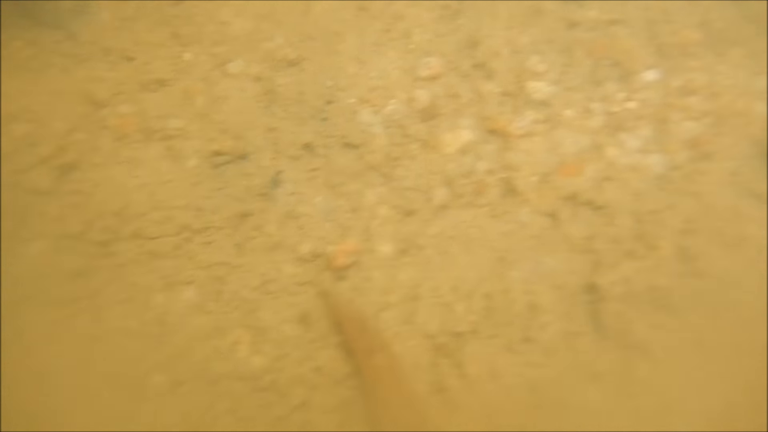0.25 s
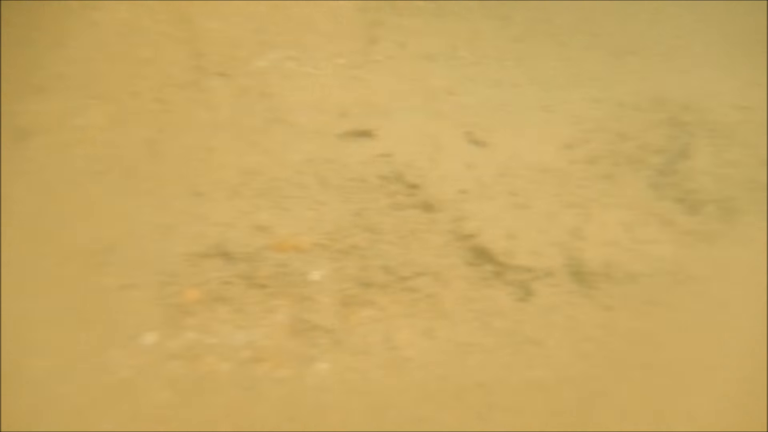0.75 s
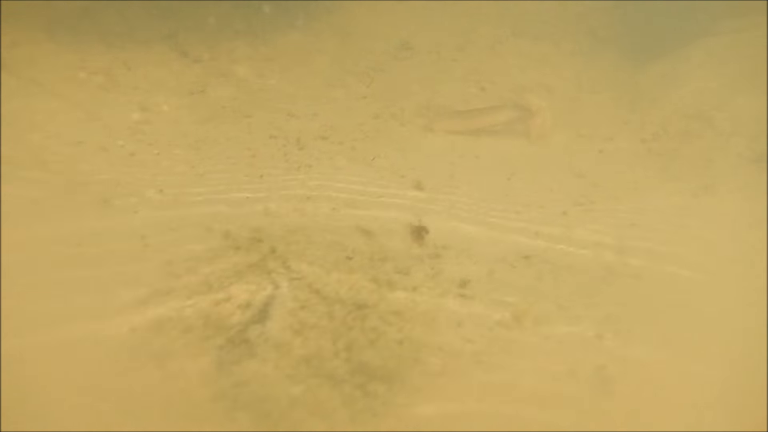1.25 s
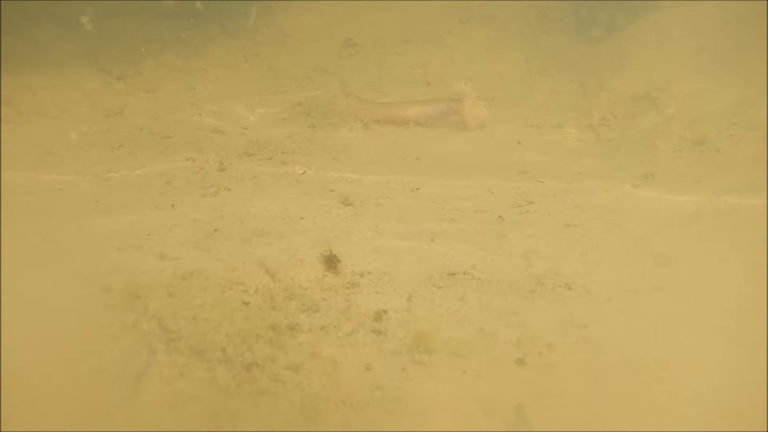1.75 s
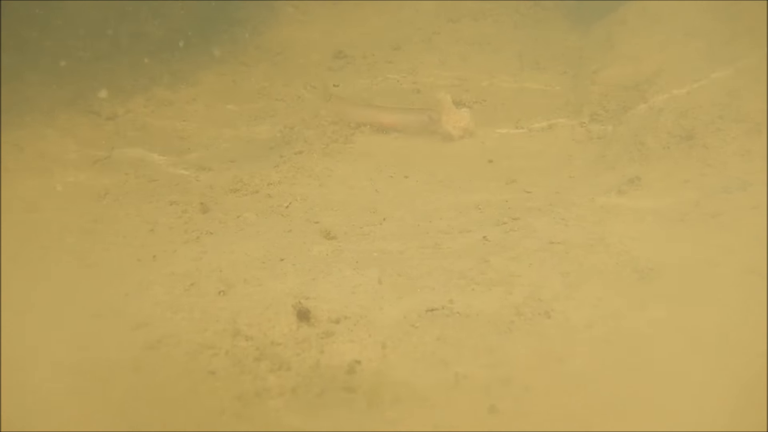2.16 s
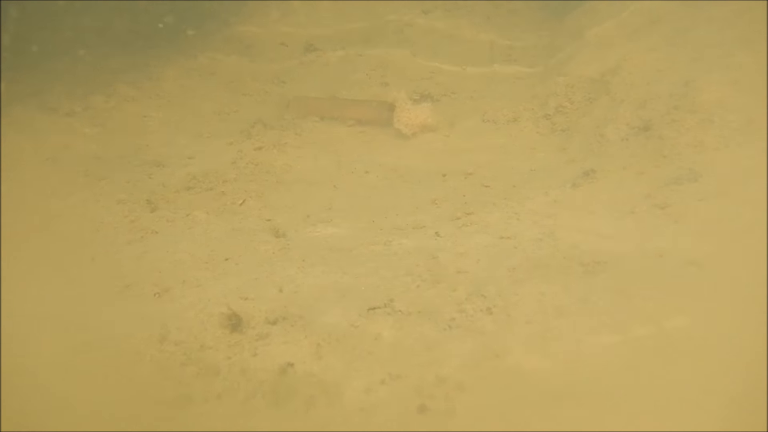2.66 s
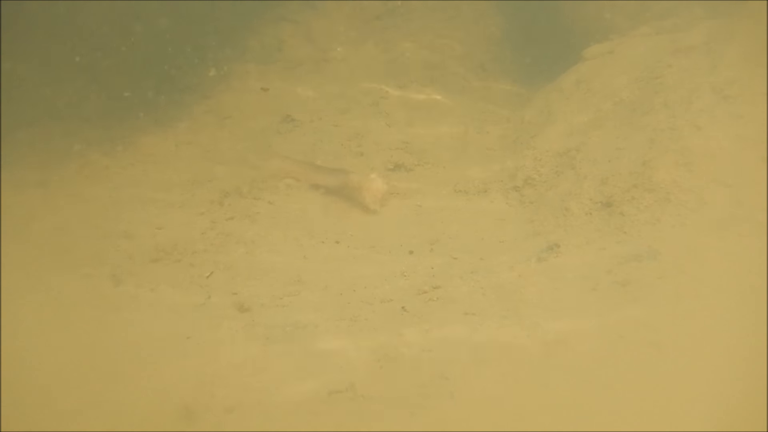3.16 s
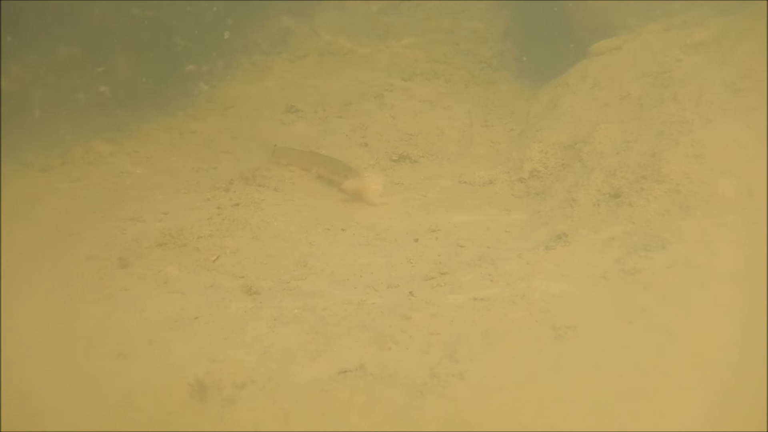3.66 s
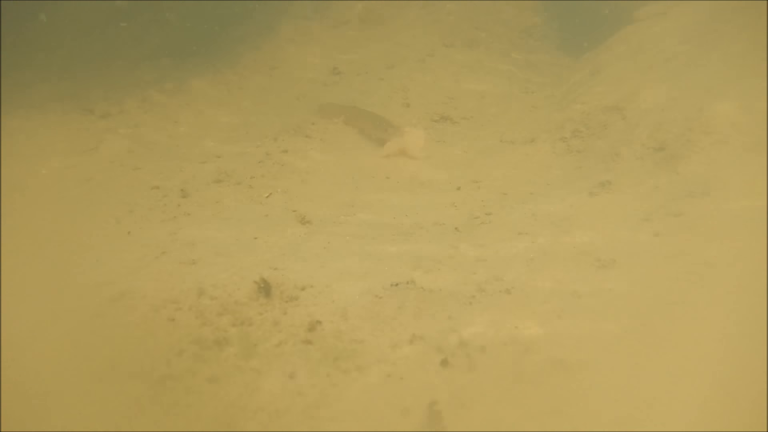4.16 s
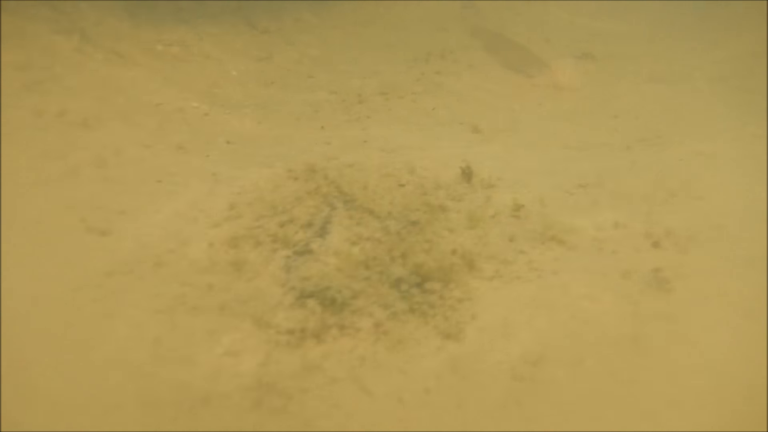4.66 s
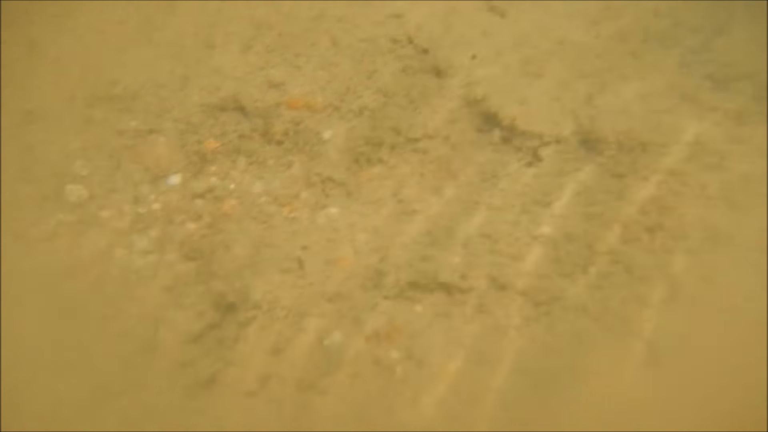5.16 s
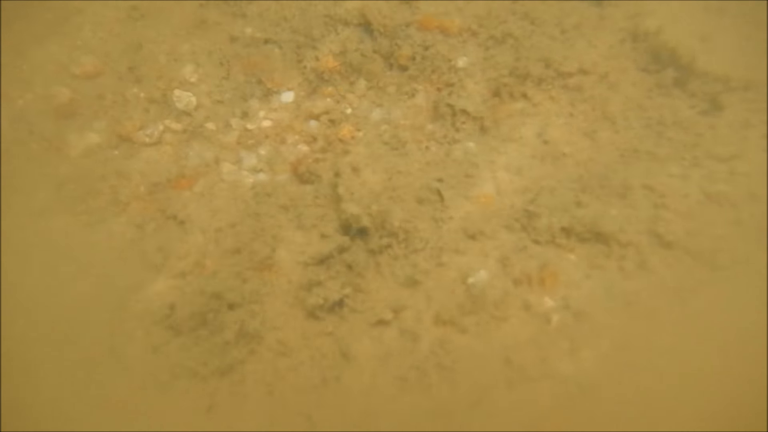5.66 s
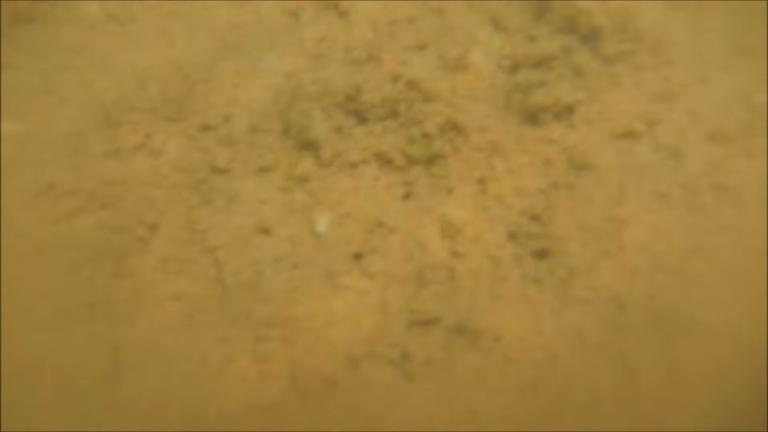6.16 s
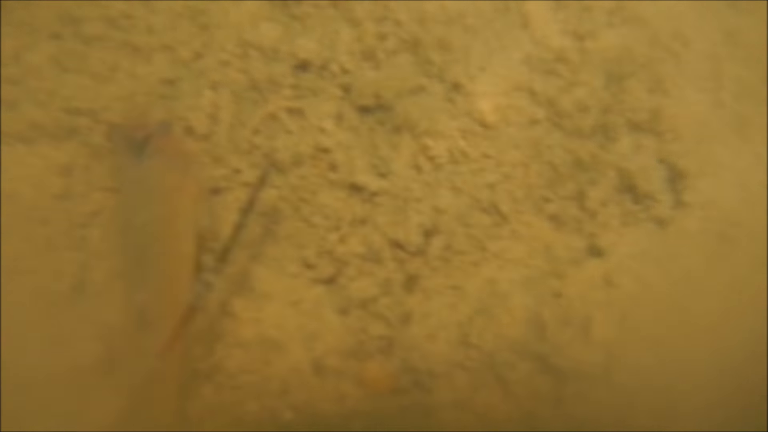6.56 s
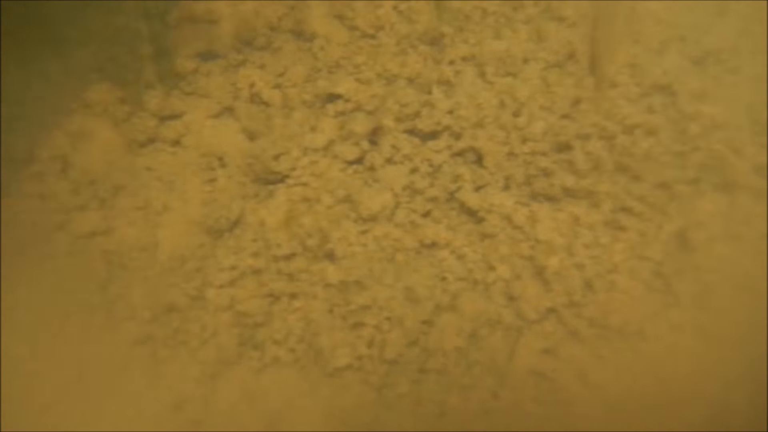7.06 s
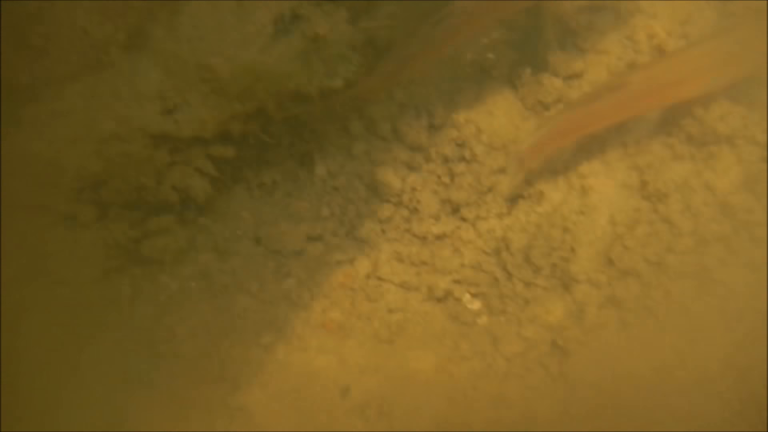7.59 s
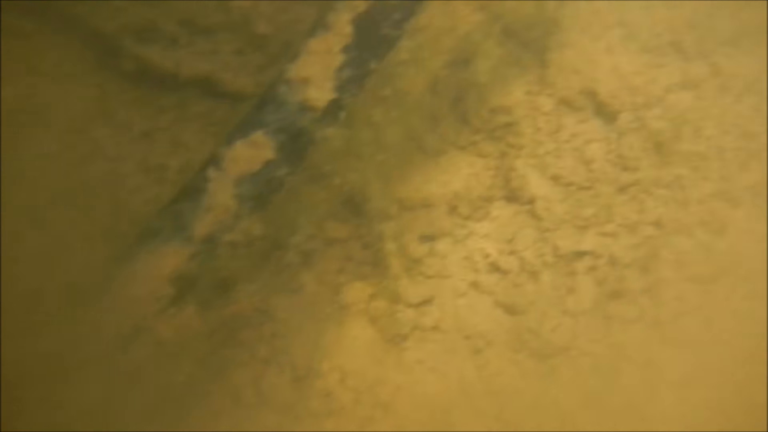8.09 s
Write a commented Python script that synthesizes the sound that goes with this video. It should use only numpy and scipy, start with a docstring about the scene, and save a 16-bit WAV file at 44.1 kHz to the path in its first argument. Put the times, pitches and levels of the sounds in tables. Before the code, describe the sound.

A microphone sealed in a camera housing hears a muffled, midrange-heavy underwater rush, a wavering hollow low hum and a deep, uneven wobble. The motion is fairly brisk at first. Around 0.4-0.55 s a cluster of hard, short, hollow knocks with clicks strikes; the background drops sharply, then climbs back over nearly two seconds. Faint scrapes and weak knocks follow, with a stronger knock at 1.5 s and others near 2.4 s. From 2.6 to 3.3 s the hum swells, and soft grip thumps and knocks gather. It calms around 3.7 s, then knocks at 4.4 s and grows busier from 5 s. A bright click and knocks at 6.4 s duck the rush again, with tiny gurgles. From 7.1 s gurgles, scrapes and dense knocks continue to about 8.3 s, ducking deeply near 8.2 s. Faint hiss, thin piping and a very high whine stay underneath.

```python
"""Moving a camera under water

A camera in a sealed housing is moved about above sand. Water and sand stir the housing's modes, which ring
over a broad wash, and its air pocket hums. The grip creaks and thumps; knocks and scrapes ring the shell,
short clicks fall mostly on knocks, and forced water gurgles. A thin piping, a whine and hiss lie on top.
At listed moments the rush, hum, small thumps, wobble, piping, whine and hiss drop in level, then climb
back; other events do not."""
import sys
import numpy as np
from scipy import signal
from scipy.fft import rfft, irfft
from scipy.io import wavfile
from scipy.ndimage import uniform_filter1d

SR = 44100
rng = np.random.default_rng(int(sys.argv[2]) if len(sys.argv) > 2 else 0)


def store_pcm(level_fs):
    """Save levels as 16-bit WAV."""
    pcm = np.round(np.clip(level_fs, -1, 1) * 32767).astype(np.int16)
    wavfile.write(sys.argv[1], SR, np.atleast_2d(pcm).T)


N = 367353  # length in samples


def undb(db):
    """Turn dB into gain."""
    return 10 ** (np.asarray(db) / 20)


def unit(x):
    """Scale to an rms of 1."""
    return x / np.sqrt(np.mean(x ** 2))


def pan(db, rad=0.):
    """Complex gains of the left and right port: the left is louder by db and leads by rad."""
    side = np.array([[.5], [-.5]])
    return undb(db * side) * np.exp(1j * rad * side)


def ring(x, hz, t60):
    """One decaying mode as a complex oscillation; it falls 60 dB in t60 seconds."""
    pole = np.exp(2j * np.pi * hz / SR - np.log(1000) / (t60 * SR))
    return signal.lfilter([1], [1, -pole], x)


def soften(x, hz):
    """Water takes the edge off a pulse: a low-pass at hz, at most 9 kHz."""
    return signal.sosfilt(signal.butter(2, min(hz, 9000), fs=SR, output="sos"), x)


def high_pass(x, order, hz):
    """Take away the part below hz."""
    return signal.sosfilt(signal.butter(order, hz, "high", fs=SR, output="sos"), x)


def spectrum_gain(points, size):
    """Gain of each frequency bin, drawn through (Hz, dB) points on a log scale."""
    hz, db = np.transpose(points)
    bins_hz = np.fft.rfftfreq(size, 1 / SR)
    return undb(np.interp(np.log(bins_hz + 1), np.log(hz), db))


def coloured(points, alike):
    """Two noises with a given spectrum; alike (-1 to 1) is how much the ports agree."""
    mid, side = irfft(rfft(rng.standard_normal((2, N))) * spectrum_gain(points, N), N)
    a, b = np.sqrt(1 + np.clip(alike, -1, 1)), np.sqrt(1 - np.clip(alike, -1, 1))
    return unit(np.array([a * mid + b * side, a * mid - b * side]))


def walk(rate):
    """Random levels held for 1 / rate seconds, then smoothed twice; spread near 1."""
    hold = int(SR / rate)
    steps = np.repeat(rng.standard_normal(N // hold + 1), hold)
    return 1.19 * uniform_filter1d(uniform_filter1d(steps, hold), hold)[:N]


def grains(rate, spread_db):
    """Lone pulses at random moments (rate per second), a few bigger than the rest."""
    hits = rng.random(N) < rate / SR
    return hits * undb(spread_db * np.minimum(rng.exponential(size=N), 3))


def swells(table):
    """Short rises in dB: a straight climb to each peak and a straight fall."""
    t = np.arange(N) / SR
    rises = [db * np.clip(1 - 2 * np.abs(t - s) / length, 0, 1) for s, length, db in table]
    return np.max(rises, axis=0)


# The modes of the housing, also used for the knocks and scrapes. ring_s is the free ring to -60 dB.
# Columns: pitch_hz, ring_s, struck_db, tilt_share, flow_db, left_over_right_db, left_lead_rad
SHELL_MODES = [(426.5, 0.032, -8.5, 0.2, 2, -5.5, 0.2), (539.7, 0.038, 1, 0.051, 3, -4.5, 1.19),
               (675, 0.022, 9.5, 0.81, -13, 1, 1.43), (845.5, 0.022, -2, 0.54, -3, 1.5, 1),
               (1321, 0.021, -7.5, 1.26, -10, -0.5, 1), (1770, 0.012, -11, 1.2, -13, 5, 1.85),
               (2140, 0.011, -16.5, 1.3, -30.5, 6, 2.4)]
SHELL_LOW_CUT_HZ = 210
# The colour of the wash. Columns: pitch_hz, level_db (per Hz, relative)
WASH_COLOUR = [(88, -50), (150, -34), (220, -18), (300, -6.5), (529, -4.5), (854, -6.5), (1100, -22.5),
               (1340, -22), (3050, -57.5), (3960, -83.5)]
RUSH_DB, RUSH_MOTION_DB = -27, 1
FIZZ_DB, FIZZ_MOTION_DB, FIZZ_DIP_SHARE = -42.5, 1, 0.93
LUMP_DB = 1.5  # spread of the lumps in the low part


def rush(motion, sunk_db):
    """Eddies and sand grains stir each shell mode on its own, over a broad wash; the low part is lumpy."""
    low, fizz, lumps = 0, 0, undb(LUMP_DB * walk(18))
    for hz, t60, _, _, flow_db, pan_db, rad in SHELL_MODES:
        eddies = rng.standard_normal(N) * undb(3.2 * walk(14))
        sand = unit(grains(60, 3.2)) * 0.49
        mode = ring(soften(eddies + sand, 1.37 * hz), hz, t60)
        voice = undb(flow_db) * unit((pan(pan_db, rad) * mode).imag)
        if hz < 1000:
            low = low + voice
        else:
            fizz = fizz + voice
    low = unit(high_pass(low, 3, SHELL_LOW_CUT_HZ))
    wash = coloured(WASH_COLOUR, 0.15) * undb(0.68 * walk(11)) * pan(-4.0).real
    low_db = RUSH_DB + RUSH_MOTION_DB * motion + sunk_db
    fizz_db = FIZZ_DB + FIZZ_MOTION_DB * motion + FIZZ_DIP_SHARE * sunk_db
    return undb(low_db) * lumps * (low + wash * undb(-3.0)) + undb(fizz_db) * unit(fizz)


# Moments when the hum swells up. Columns: peak_s, length_s, rise_db
HUM_SWELLS = [(.3, 0.14, 9.5), (.46, 0.06, 26), (2.05, 0.13, 8), (2.37, 0.13, 13), (2.54, 0.21, 16.5),
              (2.62, 0.2, 9), (2.8, 0.087, 7), (3.16, 0.043, 15.5), (5.1, 0.076, 12.5), (5.26, 0.06, 5),
              (7.63, 0.039, 20)]
HOLLOW_HZ, HOLLOW_WIDTH_HZ, HOLLOW_WANDER_HZ, HOLLOW_PAN_DB = 279.9, 35, 7, -4  # nominal width
HUM_DB, HUM_MOTION_DB, HUM_DIP_SHARE, HUM_WAVER_DB = -33, 4, 0.98, 3.5


def hollow(motion, sunk_db):
    """The air pocket in the housing hums: noise in a narrow resonance, its swings partly evened out."""
    z = ring(rng.standard_normal(N), HOLLOW_HZ, 2.2 / HOLLOW_WIDTH_HZ)
    z = ring(z, HOLLOW_HZ, 0.96 / HOLLOW_WIDTH_HZ)
    evened = z / (np.abs(z) + 1e-9) ** 0.16
    z = ring(evened, HOLLOW_HZ, 0.89 / HOLLOW_WIDTH_HZ)
    # the pocket changes shape, so its pitch wanders
    z = z * np.exp(2j * np.pi * np.cumsum(HOLLOW_WANDER_HZ * walk(9)) / SR)
    hum_db = HUM_DB + HUM_MOTION_DB * motion + HUM_DIP_SHARE * sunk_db
    hum_db = hum_db + swells(HUM_SWELLS) + HUM_WAVER_DB * walk(15)
    return undb(hum_db) * unit((pan(HOLLOW_PAN_DB, 0.15) * z).imag)


# Rubbing along the shell. tilt_db lifts (+) or lowers (-) modes by their share.
# Columns: start_s, length_s, level_db (relative), tilt_db
SCRAPES = [(0.413, 0.087, -17, -9), (0.61, 0.071, -24, -12), (0.997, 0.046, -31, -2),
           (1.053, 0.049, -30.5, -7.5), (1.396, 0.027, -30, -12), (1.71, 0.071, -27.5, -13.5),
           (2.053, 0.08, -20.5, -15), (2.306, 0.12, -21, -9), (3.033, 0.056, -15.5, -23),
           (3.134, 0.02, -14.5, -13), (4.435, 0.025, -14, -29), (5.04, 0.07, -22, -2.5),
           (5.09, 0.22, -20, -22), (5.497, 0.1, -20, -11.5), (6.093, 0.035, -24, 4),
           (6.167, 0.041, -15.5, 0.5), (6.292, 0.1, -16, -13.5), (6.404, 0.079, -21.5, -7.5),
           (6.513, 0.083, -23, -11.5), (6.684, 0.021, -31.5, 7), (7.239, 0.029, -26.5, 7.5),
           (7.469, 0.027, -18, 0.5), (7.783, 0.057, -18, -26), (7.913, 0.13, -16, -13),
           (8.038, 0.06, -21, -19), (8.186, 0.085, -21.5, -13.5)]


def scrape_force(grit, tilt_share):
    """Each scrape is a shower of grit that swells and fades."""
    t = np.arange(N) / SR
    force = np.zeros(N)
    for start, length, rub_db, tilt_db in SCRAPES:
        span = slice(int(start * SR), int((start + length) * SR))
        progress = np.abs((t[span] - start) / length)
        envelope = np.abs(np.sin(np.pi * progress ** 0.85))
        force[span] += undb(rub_db + tilt_share * tilt_db - 18.5) * envelope * grit[span]
    return force


# Single knocks. tilt_db works as above; main_hz is the bent pitch of the second mode.
# Columns: start_s, level_db (relative), tilt_db, main_hz, ring_length (nominal, free shell = 1)
KNOCKS = [(0.3981, -3.5, -8, 578, 0.73), (0.4263, -14, -16, 540, 0.73), (0.4455, -1.5, -22, 536, 0.51),
          (.457, -1, -12, 580, 0.46), (.4635, -7, -15, 575, 0.61), (0.526, -4.5, -17, 544, 0.68),
          (.611, -22.5, -18.5, 536, 0.89), (.724, -16.5, -21, 487, 0.51), (0.7816, -20, -22, 511, 1.47),
          (1.013, -24, -12, 555, 0.61), (1.0305, -28.5, -7, 687, 0.86), (1.077, -27, -19, 503, 0.88),
          (1.129, -22, -32, 510, 0.56), (1.504, -0.5, -6.5, 523, 0.45), (1.72, -17.5, -25, 500, 0.51),
          (1.767, -20, -20, 550, 0.57), (1.787, -10.5, -32, 514, 0.48), (2.042, -12.5, -33, 536, 1),
          (2.375, -2, -29, 525, 0.63), (2.629, -11, -24, 510, 0.54), (3.032, -6.5, -35, 520, 0.67),
          (3.06, -9.5, -16, 516, 0.53), (3.067, -9.5, -16, 513, 0.35), (3.153, -12, -18, 540, 0.76),
          (3.164, -13, -25, 534, 0.76), (3.29, -5.5, -22, 497, 0.42), (4.443, -0.5, -33, 503, 0.55),
          (4.456, -10.5, -30, 453, 0.58), (4.694, -10.5, -21, 732, 0.62), (4.937, -4.5, -31, 472, 0.66),
          (5.333, -13.5, -13, 540, 0.72), (5.417, -2, -24, 552, 0.64), (5.591, -9.5, -23, 510, 0.88),
          (5.609, -1.5, -12.5, 514, 0.37), (5.756, -2, -26, 520, 0.41), (6.064, -9.5, -17, 514, 0.59),
          (6.092, -20, 7, 535, 0.86), (6.103, -14, 1.5, 524, 0.4), (6.186, -12.5, 2.5, 546, 0.42),
          (6.36, -3, -0.5, 508, 0.44), (6.396, -8, 3.5, 530, 0.44), (6.521, -22, -4, 534, 0.79),
          (6.689, -36, 13, 542, 0.57), (7.087, -2.5, -42, 537, 0.63), (7.176, -29, 11, 552, 0.87),
          (7.245, -28, 8, 530, 0.8), (7.3351, -4.5, -16, 532, 0.64), (7.396, -8, -19, 534, 0.51),
          (7.412, -15, -12, 520, 0.62), (7.48, -17.5, 7, 535, 0.67), (7.489, -18, 4, 540, 0.6),
          (7.537, -2.5, -10, 522, 0.44), (7.629, -3.5, -12, 520, 0.49), (7.874, -4.5, -9.5, 510, 0.8),
          (7.895, -9.5, -10.5, 547, 0.92), (7.931, -9, -18.5, 514, 0.44), (7.952, -10.5, -22.5, 543, 0.63),
          (7.967, -11.5, -22, 540, 0.62), (8.011, -7, -14.5, 535, 0.52), (8.173, -9.5, 1, 557, 0.89),
          (8.22, -6, -7.5, 529, 0.66), (8.225, -4, -5, 527, 0.68)]
SPOT_DB, DETUNE = 1.2, 0.014  # spread from blow to blow: level, share of the pitch
RISE_CYCLES, IN_STEP_S = 0.57, 0.002805  # build-up; time when the modes swing in step
TAIL_DB, TAIL_STRETCH = -15.5, 2.91  # faint tail: its level, how many times longer it rings


def knock_blows(hz, t60, tilt_share):
    """Water loads the shell so a blow builds up; the hand damps it and bends its pitch; a tail rings on."""
    s, db, tilt_db, main_hz, ring_length = np.transpose(KNOCKS)[:, :, None]
    spot, off = rng.standard_normal((2, len(s), 1))  # every blow lands on another spot
    since = np.arange(SR // 10) / SR
    blow_hz = hz * main_hz / SHELL_MODES[1][0] * (1 + DETUNE * off)
    fade = np.exp(-np.log(1000) * since / (0.88 * t60 * np.abs(ring_length)))
    rise = (1 - np.exp(-since * hz / RISE_CYCLES)) ** 4
    shape = rise * (fade + undb(TAIL_DB) * fade ** (1 / TAIL_STRETCH))
    swing = np.exp(2j * np.pi * blow_hz * (since - IN_STEP_S))
    blows = -2.1 * undb(db + tilt_share * tilt_db + SPOT_DB * spot) * shape * swing
    out = np.zeros(N, complex)
    for at, blow in zip((s[:, 0] * SR).astype(int), blows):
        out[at:at + len(blow)] += blow[:N - at]
    return out


SHELL_TOP_HZ = 2290


def contacts():
    """Knocks are single pushes and scrapes are showers of grit; both ring the shell."""
    grit = unit(grains(700, 3.5) * rng.choice([-1, 1], N))
    out = 0
    for hz, t60, struck_db, tilt_share, _, pan_db, rad in SHELL_MODES:
        force = soften(scrape_force(grit, tilt_share), 1.43 * hz)
        swell = ring(force, hz, 0.013) / (0.00092 * SR)
        z = ring(swell, hz, 0.47 * t60) + knock_blows(hz, t60, tilt_share)
        out = out + undb(struck_db) * (pan(pan_db, rad) * z).imag
    return soften(high_pass(out, 2, SHELL_LOW_CUT_HZ), SHELL_TOP_HZ)


# Short clicks, mostly on knocks. Columns: start_s, level_db (relative), length_s
CLICKS = [(0.399, -22.5, 0.0059), (0.458, -22, 0.0008), (.7746, -44, 0.003), (1.504, -22.5, 0.0031),
          (2.375, -30, 0.0012), (4.444, -28, .0018), (5.413, -26, 0.0021), (5.607, -22.5, 0.0013),
          (6.3603, -14.5, 0.0036), (6.3976, -25, 0.0016), (7.479, -31, 0.0048), (7.54, -23, 0.0013),
          (7.629, -24.5, 0.0013), (7.8737, -25.5, 0.0018), (8.176, -22, 0.0021), (8.2274, -25.5, 0.0028)]
# The colour of a click. Columns: pitch_hz, level_db (per Hz, relative)
CLICK_COLOUR = [(700, -22), (1300, 3), (2200, 2), (3500, -19.5), (5000, -23), (9000, -31.5), (14000, -37)]


def clicks():
    """Each click is a few milliseconds or less of click noise, partly different at the two ports."""
    burst, click_noise = np.zeros((2, N)), coloured([(100, 0), (20000, 0)], .5)
    for s, db, length in CLICKS:
        at, size = int(s * SR), int(length * SR) + 2
        burst[:, at:at + size] += undb(db) * signal.windows.hann(size) * click_noise[:, at:at + size]
    taps = np.fft.fftshift(irfft(spectrum_gain(CLICK_COLOUR, 512)))
    return signal.fftconvolve(burst, taps[None] / np.linalg.norm(taps), "same")


# The hand shifts on the grip. Columns: peak_s, length_s, rise_db
GRIP_SHIFTS = [(2.71, 0.2, 12), (2.9, 0.081, 13), (3.04, 0.25, 15), (3.16, 0.11, 22), (3.97, 0.079, 14),
               (5.06, 0.13, 6.5), (7.4, 0.41, 2.5), (5.33, 0.07, 4.5)]
# The biggest jerks of the grip. Columns: start_s, level_db (relative)
JERKS = [(0.006, -20), (0.079, -15), (2.705, -14.5), (2.716, -16), (2.901, -16.5), (3.044, -14.5),
         (3.138, -20), (3.356, -15), (3.951, -15.5), (4.413, -16.5), (4.433, -14.5), (5.036, -12.5),
         (5.065, -18), (5.179, -14), (5.192, -16), (5.334, -16), (6.262, -18), (6.269, -12.5), (6.345, -15),
         (7.336, -15.5), (7.36, -15), (7.451, -15)]
# levels going into the thump shaping and the panning
GRIP_DB, GRIP_MOTION_DB, GRIP_DIP_SHARE, GRIP_WAVER_DB = -59, 19.5, 0.73, 2
WOBBLE_DB, WOBBLE_MOTION_DB, WOBBLE_DIP_SHARE, WOBBLE_SHIFT_SHARE = -39.5, 9.5, 0.74, 0.6


def grip(motion, sunk_db):
    """The hand slips in uneven jerks: soft thumps over a deep wobble, different at each port."""
    shift_db = swells(GRIP_SHIFTS)
    grip_db = GRIP_DB + GRIP_MOTION_DB * motion + GRIP_DIP_SHARE * sunk_db
    grip_db = grip_db + shift_db + GRIP_WAVER_DB * walk(12)
    wobble_db = WOBBLE_DB + WOBBLE_MOTION_DB * motion + WOBBLE_DIP_SHARE * sunk_db
    wobble_db = wobble_db + WOBBLE_SHIFT_SHARE * shift_db
    slips = np.array([grains(110, 1.0) for _ in range(2)])
    slips = unit(slips + 0.076 * slips[::-1]) * undb(grip_db)  # a little reaches the other port
    s, jerk_db = np.transpose(JERKS)
    # the big jerks keep their level in a dip
    slips[:, (s * SR).astype(int)] += undb(jerk_db + 7.0) * rng.choice([-1, 1], len(s))
    push = signal.windows.hann(int(0.003 * SR))  # one-sided, 3 ms
    thumps = np.array([np.convolve(port, push)[:N] for port in slips])
    thumps = high_pass(thumps, 2, 60)
    wobble_colour = [(12, -28.5), (22, 6.0), (55, 0.5), (110, -8.0), (220, -22.5), (400, -66.5)]
    wobble = coloured(wobble_colour, -0.54)
    return thumps * pan(-7).real + undb(wobble_db) * wobble * pan(-8.0).real


# Bright gurgles. Columns: start_s, length_s, pitch_hz, level_db (rms before the edges fade)
GURGLES = [(1.016, .022, 1680, -52), (1.725, 0.026, 1980, -55), (6.412, 0.024, 1630, -40.5),
           (6.455, 0.015, 1400, -38.5), (7.172, 0.02, 1390, -42), (7.473, 0.015, 1440, -30.5)]
GURGLE_T60_S, GURGLE_PAN_DB, GURGLE_LEAD_RAD = 0.0058, 4, 0.92


def gurgles():
    """Water forced through a gap sputters in a short bright resonance."""
    out, sputter = np.zeros((2, N)), rng.standard_normal(N)
    for s, length, hz, db in GURGLES:
        at, size = int(s * SR), int(length * SR)
        z = ring(ring(sputter[at:at + size], hz, GURGLE_T60_S), hz, GURGLE_T60_S / 2)
        voice = unit((pan(GURGLE_PAN_DB, GURGLE_LEAD_RAD) * z).imag)
        out[:, at:at + size] += undb(db) * voice * signal.windows.tukey(size, .3)
    return out


# Stretches of piping; a row that ends before it starts adds nothing. Columns: start_s, end_s
PIPES = [(.05, 0.39), (.7, .76), (.88, 1.03), (1.11, 0.93), (1.2, 1.19), (1.84, 2.3), (2.55, 2.54),
         (3.19, 2.85), (4.74, 4.5), (5.24, 5.25), (5.7, 5.84), (7.41, 7.53)]
PIPING_HZ, PIPING_DB, PIPING_REST_DB = 2495, -74.5, -13  # rest: change between the stretches


def piping(sunk_db):
    """A thin tone, noise in a narrow resonance, comes and goes, nearly opposite at the two ports."""
    t = np.arange(N) / SR
    sounding = np.any([(t > start) & (t < end) for start, end in PIPES], axis=0)
    on = uniform_filter1d(1. * sounding, SR // 50)
    z = ring(soften(rng.standard_normal(N), 3000), PIPING_HZ, 0.07) * undb(2.0 * walk(30))
    tone = unit((pan(8.5, 4.2) * ring(z, PIPING_HZ, 0.05)).imag)
    return undb(PIPING_DB + sunk_db + PIPING_REST_DB * (1 - on)) * tone


# The colour of the hiss. Columns: pitch_hz, level_db (per Hz, relative)
HISS_COLOUR = [(1500, -12.5), (2500, -8), (3500, -4), (5000, -8.5), (8000, -12), (13000, -14),
               (14400, -15.5), (15500, -28)]
WHINE_HZ, WHINE_DB = 14835.3, -68
HISS_DB, HISS_KNEE_DB = -59, -4.5  # knee: dips deeper than this pull the hiss down faster


def circuit(dip_db):
    """Amplifier hiss, nearly unrelated in the two channels, and a whine of steady pitch; both waver in level."""
    t = np.arange(N) / SR
    whine_db = WHINE_DB + dip_db + 2.5 * walk(25)
    whine = np.sqrt(2) * undb(whine_db) * np.sin(2 * np.pi * WHINE_HZ * t)
    hiss_db = HISS_DB + dip_db + 1.9 * np.minimum(dip_db - HISS_KNEE_DB, 0) + 0.88 * walk(22)
    return whine + undb(hiss_db) * coloured(HISS_COLOUR, 0.078)


# Level drops at hard knocks. Columns: start_s, depth_db
DIPS = [(0.404, -18.5), (.46, -22.5), (1.506, -13), (4.447, -3), (5.42, -3.5), (5.611, -6.5),
        (6.366, -15.5), (7.541, -6), (7.631, -7), (7.877, -7.5), (8.176, -7.5), (8.228, -28.5)]
CLIMB_DB_PER_S = 12.5


def dips():
    """Level drop in dB: a step down at each listed moment, then a steady climb."""
    t = np.arange(N) / SR
    drops = [np.where(t >= s, np.minimum(db + CLIMB_DB_PER_S * (t - s), 0), 0) for s, db in DIPS]
    return np.min(drops, axis=0)


# How briskly the camera is being moved. Columns: time_s, motion (0 to 1)
MOTION = [(0, 0.75), (.4, 0.74), (.62, 0.32), (1.3, 0.3), (1.75, 0.41), (2.2, 0.52), (2.6, 0.32),
          (3.7, 0.03), (4.4, 0.46), (5.05, 0.83), (5.7, 1), (6.36, 1), (6.5, 0.5), (6.85, 0.32), (7.2, 0.6),
          (7.28, 1), (7.55, 0.95), (7.72, 1), (8.001, 0.9), (8.17, 0.84), (8.33, 0.34)]
SETTLE_S = 0.013


def scene():
    """All sources at the two ports; motion lifts the rush, hum and grip, and dips reach them a little late."""
    motion = np.interp(np.arange(N) / SR, *np.transpose(MOTION))
    dip_db = dips()
    keep = np.exp(-1 / (SETTLE_S * SR))
    sunk_db = signal.lfilter([1 - keep], [1, -keep], dip_db)  # the piping follows this too
    water = rush(motion, sunk_db) + hollow(motion, sunk_db) + gurgles()
    handling = contacts() + grip(motion, sunk_db)
    return water + handling + clicks() + piping(sunk_db) + circuit(dip_db)


TOP_HZ = 15300


def record(dry):
    """The loudest peaks are rounded below full scale and the top is cut."""
    rounded = dry / (1 + dry ** 6) ** (1 / 6)
    return signal.sosfilt(signal.ellip(8, .2, 70, TOP_HZ, fs=SR, output="sos"), rounded)


dry = scene()
out = record(dry)
store_pcm(out)
```